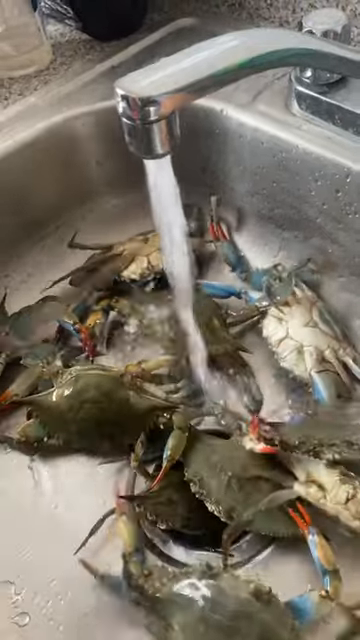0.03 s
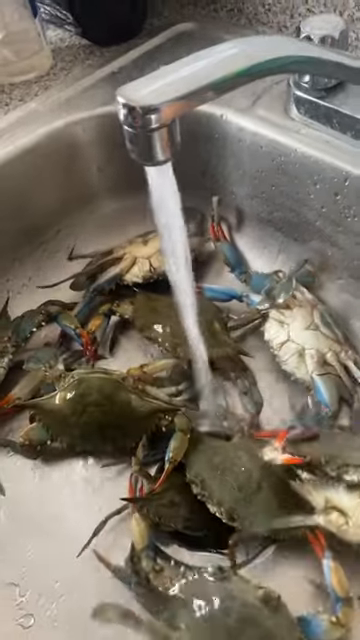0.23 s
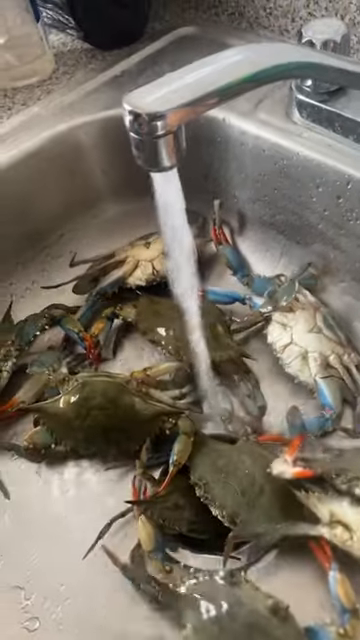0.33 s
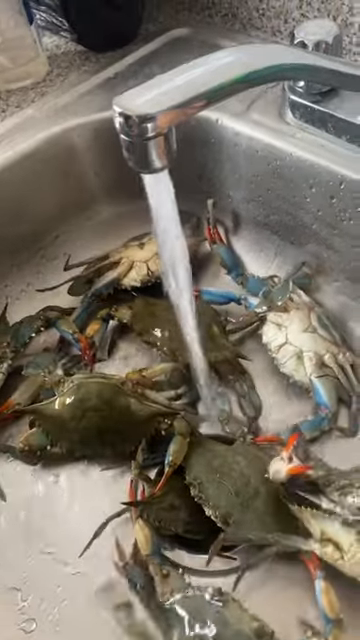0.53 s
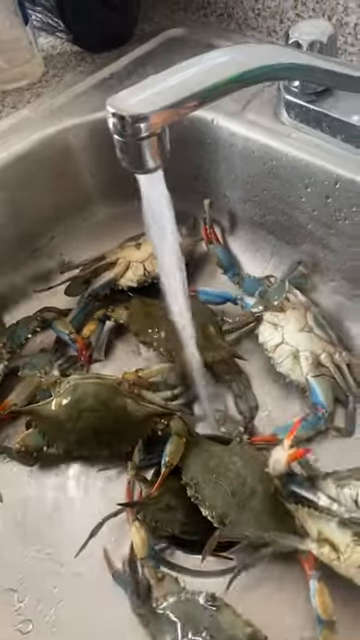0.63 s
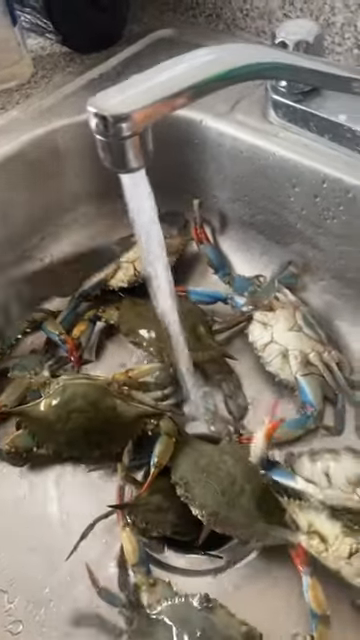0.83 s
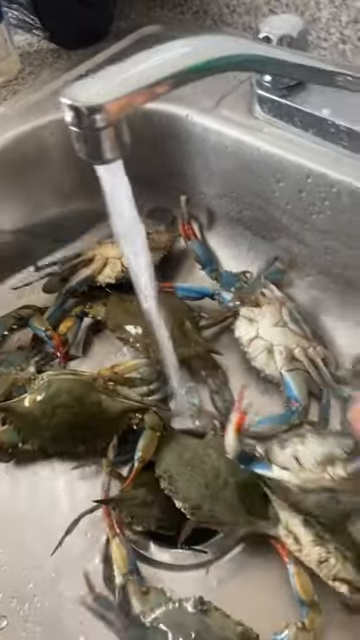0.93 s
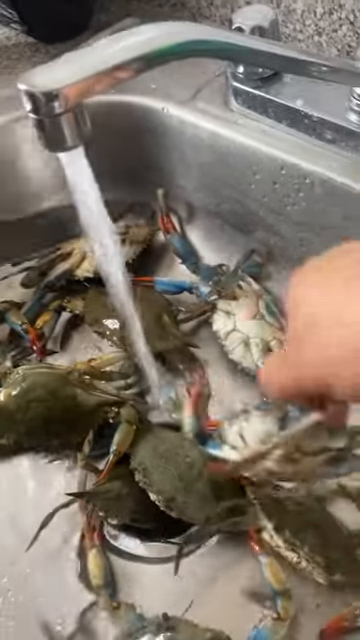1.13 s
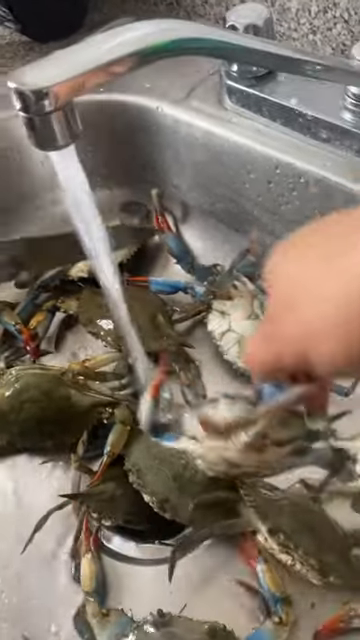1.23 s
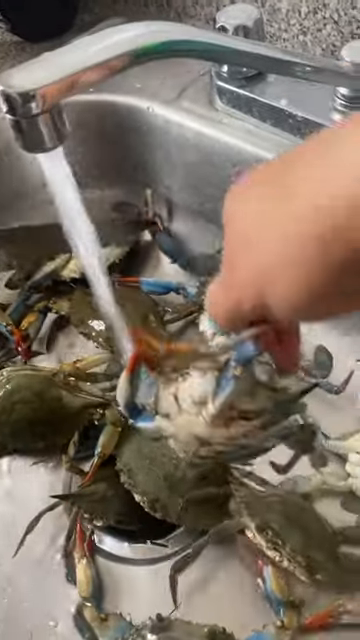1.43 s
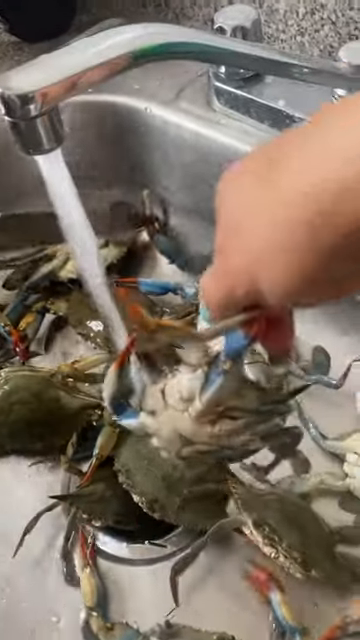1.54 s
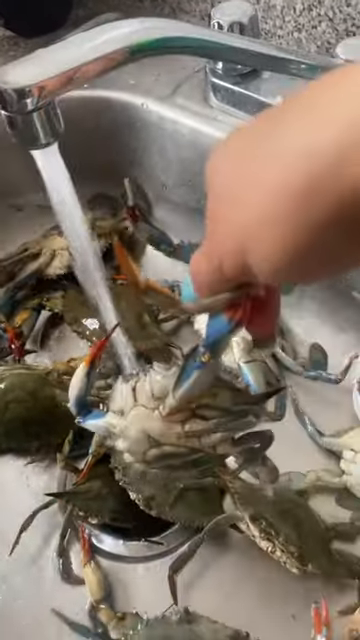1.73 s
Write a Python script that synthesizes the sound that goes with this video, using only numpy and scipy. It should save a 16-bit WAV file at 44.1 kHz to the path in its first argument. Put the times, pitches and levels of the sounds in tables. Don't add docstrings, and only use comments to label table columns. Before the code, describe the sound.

Steady faucet stream hissing and drumming in a steel basin while crabs thud, bump and tick

```python
import sys
import numpy as np
from scipy import signal
from scipy.fft import rfft, irfft, next_fast_len
from scipy.io import wavfile
from scipy.ndimage import uniform_filter1d

SR = 44100
rng = np.random.default_rng(int(sys.argv[2]) if len(sys.argv) > 2 else 0)


def transcribe(u):
    v = np.clip(np.atleast_2d(u).T, -1, 1)
    q = np.round(v * 32767).astype(np.int16)
    wavfile.write(sys.argv[1], SR, q)


def attenuation_scalar(level_db):
    decades = np.asarray(level_db, float) / 20
    return 10 ** decades


N = 79380


def rms_one(x):
    return x / np.sqrt(np.mean(x ** 2) + 1e-20)


def drift(rate_hz):
    r = np.exp(-80 * np.pi * rate_hz / SR)
    noise = rng.standard_normal(N // 40 + 2002)
    slow = signal.lfilter([1], [1, -2 * r, r * r], noise)[2000:]
    return np.interp(np.arange(N) / 40, np.arange(len(slow)), rms_one(slow - slow.mean()))


def ring(clicks, hz, t60):
    r = attenuation_scalar(-60 / (t60 * SR))
    w = 2 * np.pi * hz / SR
    return signal.lfilter([0, np.sin(w)], [1, -2 * r * np.cos(w), r * r], clicks + 1e-18)


PATCHY_DB = 4


def resonant(table):
    out = np.zeros(N)
    for hz, width_hz, level_db in table:
        tone = rms_one(ring(rng.standard_normal(N), hz, 3.83 / width_hz))
        out += attenuation_scalar(level_db + PATCHY_DB * drift(16.3)) * tone
    return rms_one(out)


def place(out, start_s, sound):
    out[int(start_s * SR):][:len(sound)] += sound


# start_s [s], level_db [dB]
SPLASH = [
    (0.0, -44),
    (1.464, -41.5),
    (1.8, -43),
]


def splash_db():
    return np.interp(np.arange(N) / SR, *np.transpose(SPLASH))


# pitch_hz [Hz], level_db [dB per Hz]
SPRAY = [(200, 4.5), (600, -1.5), (1800, -9), (3500, -9.5), (6000, -8), (9000, -11), (12500, -23.5),
         (16000, -15)]
SPRAY_DB, SPRAY_FOLLOWS = 3.5, 0.31


def spray(swing_db):
    out, together = np.zeros(N), drift(50)
    edges = 170 * 2 ** (np.arange(21) / 3)
    white = rng.standard_normal((2, N))
    hz_at, db_at = np.transpose(SPRAY)
    for k, (low, high) in enumerate(zip(edges, edges[1:])):
        sos = signal.butter(2, [low, high], "band", fs=SR, output="sos")
        band = signal.sosfilt(sos, white[k % 2])
        treble = low > 7000
        db = np.interp(np.log(low * high) / 2, np.log(hz_at), db_at)
        flicker_db = PATCHY_DB * (0.7 * together + 0.5 * drift(29)) / (1 + treble)
        out += band * attenuation_scalar(db + flicker_db - (1 - SPRAY_FOLLOWS) * swing_db * treble)
    return attenuation_scalar(SPRAY_DB) * rms_one(out)


# pitch_hz [Hz], width_hz [Hz], level_db [dB]
BASIN = [(209, 15, -12.5), (423, 30, -9), (594.7, 17, -4.5), (940, 88, -4), (1126, 130, 1.5),
         (1588, 97, -2.5), (2277, 52, -3.5), (3357, 110, -4), (4040, 92, -34), (4746, 46, -7.5),
         (5670, 1070, -0.5)]


def basin_tone():
    return attenuation_scalar(-0.5) * resonant(BASIN)


# start_s [s], gain_db [dB]
STIR = [
    (0, 1),
    (.3, 1.5),
    (0.582, 5.5),
    (.66, -6.5),
    (.92, -1),
    (1.03, 5.5),
    (1.149, -4),
    (1.55, 3.5),
    (1.8, 4),
]


def stirred(bright):
    murmur = signal.filtfilt(*signal.butter(1, 1300, fs=SR), bright)
    gain_db = np.interp(np.arange(N) / SR, *np.transpose(STIR))
    return bright + murmur * (attenuation_scalar(gain_db) - 1)


# pitch_hz [Hz], width_hz [Hz], level_db [dB]
DRUM = [(54.5, 46, -8.5), (81, 73, 1), (105, 19, -2), (143, 11, 1)]
DRUM_DB, DRUM_LUMPY_DB = -37.5, 1.5


def floor_drum():
    return attenuation_scalar(DRUM_DB + DRUM_LUMPY_DB * drift(31)) * resonant(DRUM)


def water():
    db = splash_db()
    bright = spray(db - db.mean()) + basin_tone()
    return attenuation_scalar(db) * stirred(bright) + floor_drum()


FIZZ_PER_S, FIZZ_DB, FIZZ_CYCLES, FIZZ_SPREAD_DB = 340, -5, 16, 3.2
FIZZ_LOW_HZ, FIZZ_HIGH_HZ = 2200, 5800


def fizz():
    sizes = attenuation_scalar(FIZZ_SPREAD_DB * np.minimum(rng.exponential(1, N), 4)) * rng.choice([-1, 1], N)
    born = rng.random(N) < FIZZ_PER_S * attenuation_scalar(3 * drift(25)) / SR
    dealt = rng.integers(0, 18, N)
    out = np.zeros(N)
    for k, hz in enumerate(np.geomspace(FIZZ_LOW_HZ, FIZZ_HIGH_HZ, 18)):
        out += ring(sizes * born * (dealt == k), hz, FIZZ_CYCLES / hz)
    return attenuation_scalar(FIZZ_DB) * rms_one(out)


def droplets():
    level = attenuation_scalar(splash_db())
    return sum(ports(level * fizz(), 0.012, 1) for spot in range(2))


# pitch_hz [Hz], level_db [dB], t60_s [s]
STEEL = [(244, -21, 0.13), (257, -7, 0.13), (303, -10.5, 0.23), (353.5, -7, 0.22), (415, -21, 0.11),
         (506, -12, 0.14), (616, -19.5, 0.2), (808, -9.5, 0.14), (1015, -11.5, 0.17), (1074, -3, 0.063),
         (1295, -23, 0.37), (1540, -11, 0.12), (1900, -18, 0.034), (2316, -8.5, 0.14)]
# start_s [s], level_db [dB], contact_cut_hz [Hz],
# free_share [share of the free ring time], crack_db [dB]
THUDS = [(0.2359, -24.5, 4970, 0.19, -34), (.2370, -11.5, 2960, 1, -17), (.2400, -6.5, 970, 0.69, -19),
         (.2615, -15, 885, 0.9, -31), (1.4800, -18.5, 1500, 0.21, -31), (1.4831, -17.5, 396, 0.18, -30),
         (1.492, -27, 513, 0.18, -45), (1.514, -18, 498, 0.5, -46), (1.6784, -35, 3030, 0.25, -17.5),
         (.554, -38, 1500, .2, -33.5), (.583, -36, 2000, .2, -25), (1.044, -35, 500, 0.36, -32)]
STRIKE_SPREAD_DB = 1.2
CRACK_CUT_HZ, CRACK_T60_S = 5360, 0.019
RATTLE_DB, RATTLE_T60_S = -10, 0.28
THUD_LOW_HZ = 205


def thuds():
    out, t = np.zeros(N + SR), np.arange(SR // 2) / SR
    crack_fade = attenuation_scalar(-60 * t / CRACK_T60_S) + attenuation_scalar(RATTLE_DB - 60 * t / RATTLE_T60_S)
    for start_s, level_db, cut_hz, free, crack_db in THUDS:
        push = t * np.exp(-2 * np.pi * cut_hz * t)
        push = push / push.sum()
        body = np.zeros(len(t))
        for hz, mode_db, t60 in STEEL:
            strike_db = mode_db + STRIKE_SPREAD_DB * rng.normal()
            body += attenuation_scalar(strike_db) * ring(push, hz, t60 * free)
        noise = rng.standard_normal(len(t))
        crack = signal.lfilter(*signal.butter(2, CRACK_CUT_HZ, fs=SR), noise) * crack_fade
        place(out, start_s, attenuation_scalar(level_db) * body + attenuation_scalar(crack_db) * crack)
    return signal.sosfilt(signal.butter(4, THUD_LOW_HZ, "high", fs=SR, output="sos"), out[:N])


# start_s [s], level_db [dB], pitch_hz [Hz], held_s [s], t60_s [s]
HELD = [(.2395, -5, 342.4, 0.023, .04), (.258, -19, 506, 0.017, 0.029), (.264, -21, 635, 0.017, 0.044),
        (.279, -16, 349, 0.025, .12), (.335, -27.5, 352, 0.023, .06), (.330, -35, 626, .03, 0.16),
        (0.289, -26, 1038, 0.011, 0.043), (0.242, -16, 268, 0.024, 0.086), (.322, -29.5, 492, 0.011, 0.033),
        (.392, -30.5, 339, .016, 0.051), (.463, -31.5, 1164, 0.0069, .02),
        (.5045, -20, 1124, 0.0076, 0.013), (.516, -26.5, 1130, 0.009, .02), (.556, -39, 914, 0.012, 0.024),
        (.583, -28, 940, 0.0087, .03), (.588, -26.5, 411, .026, 0.044), (.746, -31.5, 415, 0.026, 0.093),
        (.436, -38, 936, 0.016, .03), (0.555, -34, 1300, 0.0096, .02), (.606, -35, 1110, 0.0037, 0.017),
        (1.4811, -13.5, 224, 0.0064, 0.045), (1.4869, -11, 336.5, 0.013, 0.023),
        (1.482, -21, 417, 0.027, 0.027), (1.487, -25.5, 680, 0.0087, 0.024), (1.513, -23, 400, 0.0078, .03),
        (1.532, -24.5, 332, .015, .04), (1.548, -31.5, 351, .022, .04), (1.603, -33, 220, 0.021, 0.043),
        (1.68, -25.5, 1570, .004, 0.013), (1.686, -27, 1950, .003, .008),
        (1.690, -22.5, 1800, 0.0028, .008), (1.6945, -25, 1730, .002, 0.017)]
HELD_RISE_CYCLES = 0.62


def held():
    out, t = np.zeros(N + SR), np.arange(SR // 4) / SR
    for start_s, level_db, hz, held_s, t60 in HELD:
        rise = 1 - np.exp(-t * hz / HELD_RISE_CYCLES)
        fade = attenuation_scalar(-60 * np.maximum(t - held_s, 0) / t60)
        place(out, start_s, attenuation_scalar(level_db) * rise * fade * np.sin(2 * np.pi * hz * t))
    return out[:N]


def swells(rows):
    out, t = np.zeros(N + SR), np.arange(SR // 2) / SR
    for start_s, level_db, hz, rise_s, t60 in rows:
        shape = (1 - np.exp(-t / max(rise_s, 1e-4))) * attenuation_scalar(-60 * t / t60)
        place(out, start_s, attenuation_scalar(level_db) * shape / shape.max() * np.sin(2 * np.pi * hz * t))
    return out[:N]


# start_s [s], level_db [dB], pitch_hz [Hz], rise_s [s], t60_s [s]
RINGS = [(.443, -34, 413.7, 0.0044, 0.43), (.515, -34.5, 404, 0.026, 0.52), (1, -36, 1500, .004, 0.065),
         (1.2, -39, 1120, 0.0033, 0.14), (.993, -23, 940, 0.0012, 0.044),
         (.994, -34.5, 1116, 0.0014, 0.079), (.996, -29, 390, 0.0036, 0.11),
         (1.044, -36, 506, 0.00098, 0.34), (1.664, -34, 334, 0.027, 0.2), (1.371, -39.5, 510, 0.0016, 0.19),
         (1.577, -31, 1430, 0.0015, 0.04), (1.6, -38, 1460, .002, .03), (1.385, -39.5, 1200, .002, 0.026)]


def rings():
    return swells(RINGS)


# start_s [s], level_db [dB], pitch_hz [Hz], rise_s [s], t60_s [s]
BUMPS = [(.040, -35.5, 139, 0.011, 0.26), (.485, -31.5, 91, 0.0049, 0.099), (.725, -41, 128, 0.005, 0.17),
         (.938, -24.5, 111, 0.0018, 0.24), (.990, -21.5, 153.3, 0.0023, 0.17),
         (1.000, -29.5, 67, 0.017, 0.48), (1.042, -20.5, 86.5, 0.008, 0.24),
         (1.046, -32, 197, 0.0031, 0.22), (1.138, -33.5, 128, 0.0035, 0.071),
         (1.205, -39, 105, 0.0065, 0.13), (1.310, -22.5, 98, 0.0014, 0.2),
         (1.370, -30.5, 131.5, 0.0058, 0.9), (1.490, -27, 56.6, 0.0067, 0.076),
         (1.600, -29, 76, .01, 0.047), (1.075, -31, 205, .004, 0.11)]


def bumps():
    return swells(BUMPS)


# start_s [s], peak_db [dB], pitch_hz [Hz]
TICKS = [(.0907, -26, 3700), (0.344, -30, 3200), (.3636, -28, 3360), (.5576, -31.5, 3300),
         (.565, -24, 3180), (.5831, -32, 1980), (.585, -32, 3020), (0.638, -24, 3330), (0.687, -26, 3170),
         (0.7116, -23, 2510), (0.7298, -23, 3170), (1.0284, -23, 3270), (1.144, -31, 2630),
         (1.171, -21, 3740), (1.2193, -20, 4120), (1.223, -18, 4100), (1.24, -20, 4470), (1.250, -22, 3230),
         (1.3008, -21.5, 3450), (1.3708, -29, 3470), (1.41, -31, 3330), (1.4182, -18, 3820),
         (1.4681, -24.5, 3500), (1.5145, -29, 3330), (1.5469, -21, 3360), (1.5668, -20.5, 3200),
         (1.5888, -18, 3460), (1.6776, -9, 2546), (1.6825, -28, 2560), (1.7269, -17.5, 4600)]
TICK_DB, TICK_CRACK_DB, TICK_CYCLES, TICK_RISE_S = -1.9, -11, 40, 0.00053


def ticks():
    out, t = np.zeros(N + SR), np.arange(SR // 20) / SR
    for start_s, peak_db, hz in TICKS:
        fade = attenuation_scalar(-60 * t * hz / TICK_CYCLES)
        tone = np.sin(2 * np.pi * hz * t) * fade * (1 - np.exp(-t / TICK_RISE_S))
        noise = np.diff(rng.standard_normal(len(t) + 1))
        crack = signal.lfilter([.1], [1, -1.3, .45], noise) * attenuation_scalar(TICK_CRACK_DB - t * 13000)
        place(out, start_s, attenuation_scalar(peak_db + TICK_DB) * (tone + crack))
    return out[:N]


# pitch_hz [Hz], right_lead_rad [rad]
LEAD = [(40, .02), (180, .08), (350, .25), (1000, .55), (1850, 0), (2500, -.7), (4700, -.7), (7350, -3.14),
        (10700, -6.28), (15700, -12.2)]
# pitch_hz [Hz], scattered_share [share of power]
SCATTER = [(150, .0004), (330, .005), (800, .55), (1850, .15), (3300, .75), (5500, .3), (6800, .035),
           (15000, .06)]
RIGHT_DB = .8


def ports(x, t60, spread):
    size = next_fast_len(N + SR)
    hz = np.arange(size // 2 + 1) * SR / size
    lead = np.interp(hz, *np.transpose(LEAD))
    share = np.clip(spread * np.interp(hz, *np.transpose(SCATTER)), 0, 1)
    t = np.arange(SR // 2) / SR
    tails = rfft(rng.standard_normal((2, len(t))) * attenuation_scalar(-60 * t / t60), size)
    tails = tails / np.sqrt(uniform_filter1d(np.abs(tails) ** 2, size=60, axis=1))
    side = np.array([[-1], [1]])
    path = np.sqrt(1 - share) * np.exp(.5j * side * lead) + np.sqrt(share) * tails
    tilt = attenuation_scalar(RIGHT_DB * side * np.exp(-2 * np.log(hz / 2600 + 1e-9) ** 2))
    return irfft(rfft(x, size) * path * tilt, size)[:, :N]


def scene():
    rubbed = (rings() + bumps()) * attenuation_scalar(2 * drift(19))
    knocks = thuds() + held() + rubbed + ticks()
    return ports(water(), .5, 0.84) + droplets() + ports(knocks, .06, .5)


# pitch_hz [Hz], limit_db [dB]
JOINT = [(1000, -40), (1800, -15), (5500, -17), (6500, -8), (7400, -6), (8500, -7), (10700, -5),
         (12200, -2.5), (14400, 3), (15000, 3.5), (15600, 6)]
ONSET_DB = 9.5


def joint_stereo(x):
    hz, _, z = signal.stft([x[0] + x[1], x[0] - x[1]], SR, nperseg=2048, boundary="even")
    power = np.abs(z[:, :1024]) ** 2
    power = np.repeat(power.reshape(2, 64, 16, -1).mean(axis=2), 16, axis=1)
    treble = power[:, 300:].sum(axis=(0, 1))
    calm = treble < np.median(treble) * attenuation_scalar(ONSET_DB)
    limit = attenuation_scalar(2 * np.interp(hz[:-1], *np.transpose(JOINT)))[:, None] * calm
    z[:, :-1] *= power > limit * power[::-1]
    mid, side = signal.istft(z, SR, nperseg=2048)[1][:, :N] / 2
    return np.array([mid + side, mid - side])


def low_pass(x):
    return signal.sosfilt(signal.butter(12, 17090, fs=SR, output="sos"), x)


MIC_LOW_HZ, TOP_HZ, LIMIT = 43.6, 16350, 1.2


def record(dry):
    x = signal.sosfilt(signal.butter(3, MIC_LOW_HZ, "high", fs=SR, output="sos"), dry)
    x = LIMIT * np.tanh(x / LIMIT)
    x = signal.sosfilt(signal.cheby2(12, 70, TOP_HZ, fs=SR, output="sos"), x)
    return low_pass(joint_stereo(x))


dry = scene()
out = record(dry)
transcribe(out)
```